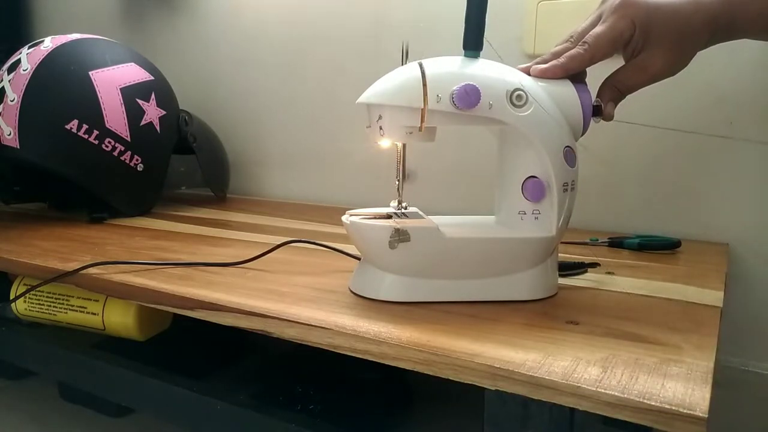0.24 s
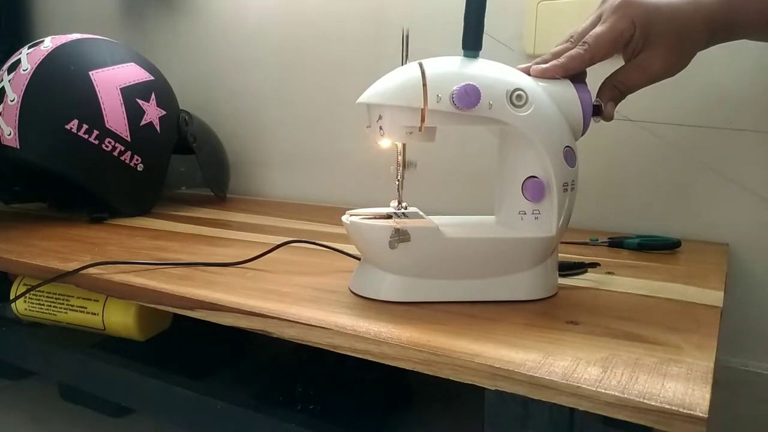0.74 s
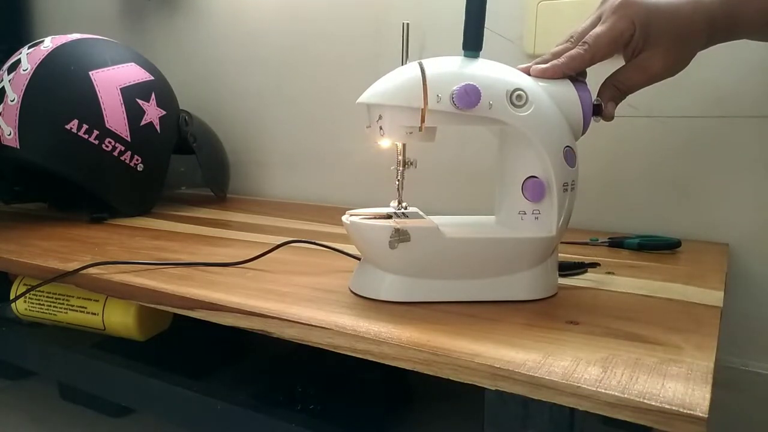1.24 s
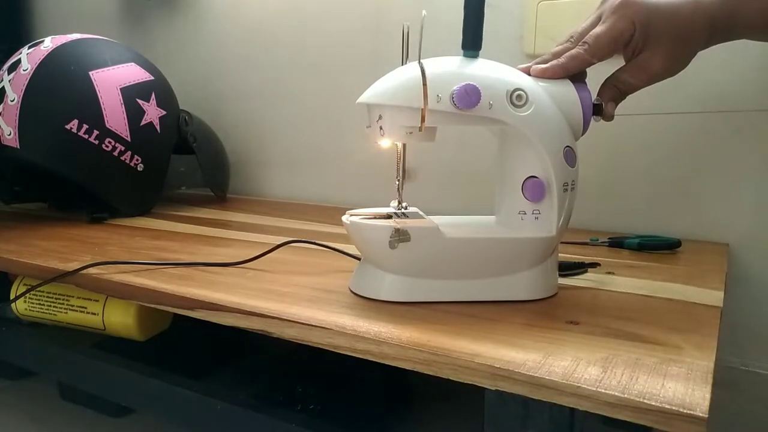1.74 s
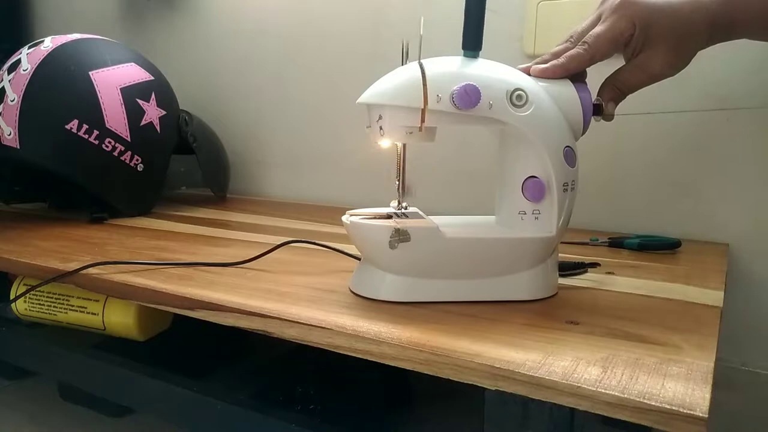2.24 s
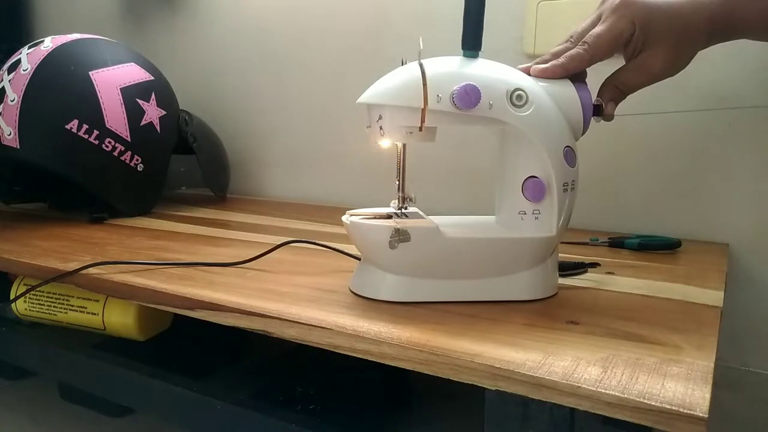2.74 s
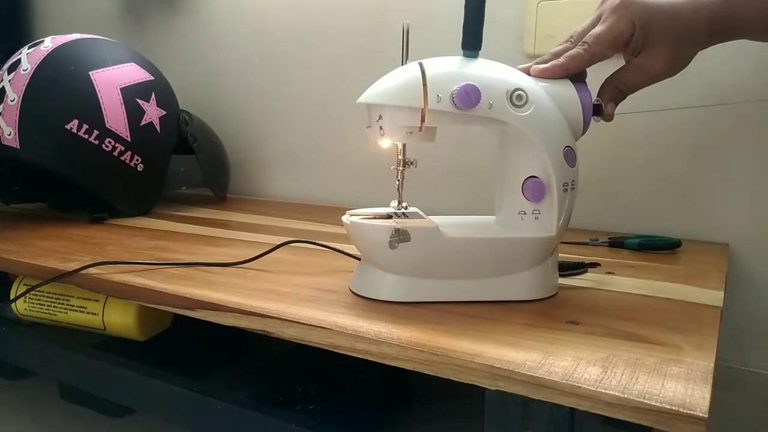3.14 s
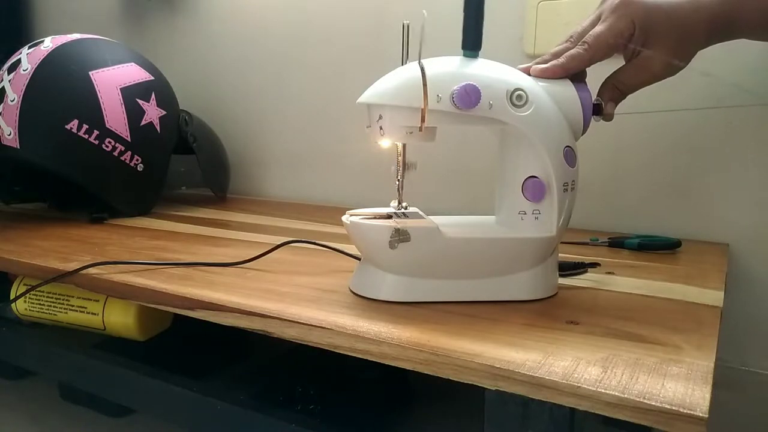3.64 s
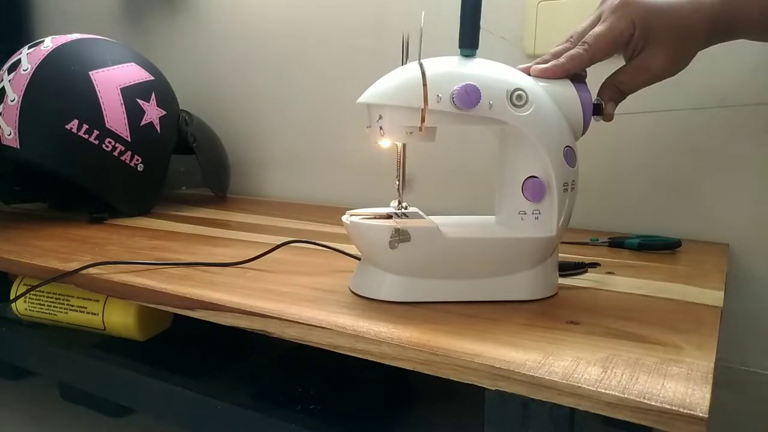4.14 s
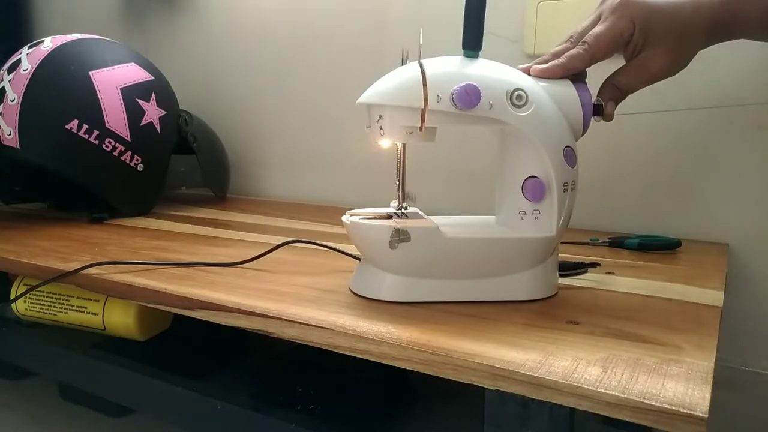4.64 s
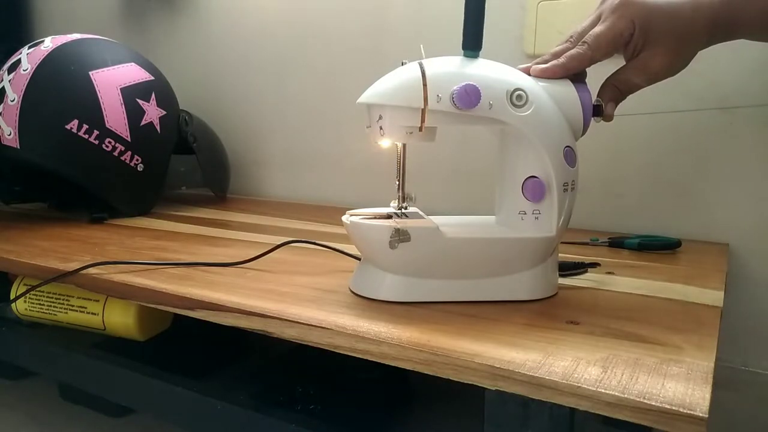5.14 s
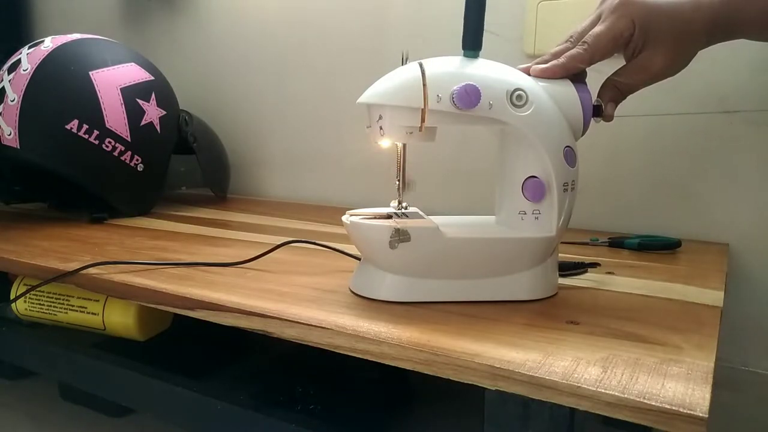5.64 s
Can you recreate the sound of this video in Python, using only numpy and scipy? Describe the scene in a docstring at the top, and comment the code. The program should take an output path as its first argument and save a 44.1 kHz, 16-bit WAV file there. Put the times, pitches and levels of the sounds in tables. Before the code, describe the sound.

A small electric sewing machine is already running at 0 s and continues without a break to the end, near 5.9 s. Its little motor gives a buzzy hum near 700 Hz under a piercing gear whine around 2.1 kHz, with a higher overtone near 4.2 kHz that gradually softens. The whine throbs and bends about thirty times a second, with a rough edge. Dense dry rattling and tiny ticks fill the plastic case. About six times a second the needle bar knocks and clacks, slightly uneven in strength, briefly pulling the motor pitch down. Brushes add a fine high hiss. A loose panel's buzz emerges after 2 s, is strongest around 3.6 s, then eases. Speed stays nearly constant, rising slightly in the last second. Faint deep table rumble and drone waver underneath. Close stereo microphone, small room, short reflections.

```python
"""A small plastic sewing machine runs steadily on a wooden table in a small room, heard close by in stereo.
Its three-pole motor hums, as sines locked to the shaft; the pinion whines against an eccentric wheel.
Dry gears rattle, tick and rub: random tiny impacts shaped by the resonances of the plastic case.
About six times a second the needle stroke knocks the case and drags the motor down for a moment.
Brushes hiss, a loose panel buzzes, and the table gives a low rumble and drone of filtered noise."""
import sys
import numpy as np
from scipy import signal
from scipy.fft import rfft, irfft
from scipy.io import wavfile

SR = 44100
rng = np.random.default_rng(int(sys.argv[2]) if len(sys.argv) > 2 else 0)


def wrap_up_sound(samples):
    """Save the sound to the file named by the first command line argument, as 16-bit audio."""
    columns = np.atleast_2d(samples).T
    # keep every value between -1 and 1, then stretch to whole-number steps
    tamed = np.clip(columns, -1, 1)
    steps = np.round(tamed * 32767).astype(np.int16)
    wavfile.write(sys.argv[1], SR, steps)


N = 260190
TIME = np.arange(N) / SR
TEETH, WHEEL_TEETH = 9, 68  # pinion, wheel

# nominal motor shaft speed: (time [s], speed [Hz])
SHAFT_SPEED = [(0, 229.85), (1, 230.99), (2, 231.05), (3, 232.06), (4, 231.18), (5, 231.12), (5.9, 236.44)]


def undb(db):
    """Decibels to gain."""
    return 10 ** (np.asarray(db) / 20)


def level(x, db):
    """Scale to an rms level."""
    return x * undb(db) / np.sqrt(np.mean(x ** 2))


def curve(rows):
    """Join (time [s], value) rows by straight lines."""
    return np.interp(TIME, *np.transpose(rows))


def cycle(wheel, place):
    """A cosine that peaks at one place of the wheel's turn."""
    return np.cos(2 * np.pi * (wheel - place))


def walk(rate_hz, step=16):
    """Smooth chance with a spread of 1, changing about rate_hz times a second."""
    coarse = TIME[::step]
    bins_hz = np.fft.rfftfreq(len(coarse), step / SR)
    lowpass = 1 / (1 + (2 * bins_hz / rate_hz) ** 4)
    slow = irfft(rfft(rng.standard_normal(len(coarse))) * lowpass, len(coarse))
    return np.interp(TIME, coarse, level(slow, 0))


def colour(x, points):
    """Filter by a (frequency [Hz], gain [dB]) spectrum."""
    hz, db = np.transpose(points)
    bins_hz = np.maximum(np.fft.rfftfreq(N, 1 / SR), 1)
    gain = undb(np.interp(np.log(bins_hz), np.log(hz), db))
    return irfft(rfft(x) * gain, N)


def resonate(x, hz, width_hz):
    """Pass a signal through one resonance, with gain 1 at its centre."""
    bins_hz = np.fft.rfftfreq(N, 1 / SR)
    return irfft(rfft(x) / (1 + 2j * (bins_hz - hz) / width_hz), N)


def mode(hz, t60_s):
    """The decaying ring of one resonance."""
    t = TIME[:SR // 2]
    return np.sin(2 * np.pi * hz * t) * np.exp(-np.log(1000) * t / t60_s)


def ring(x, response):
    """Pass a signal through an impulse response."""
    return signal.fftconvolve(x, response)[:N]


def room(x, wet_db, t60_s):
    """Direct sound plus a decaying noise tail of reflections, different at the two ports."""
    t = TIME[:SR // 2]
    tails = rng.standard_normal((2, len(t))) * undb(-60 * t / t60_s)
    tails *= t > .002  # gap before the first reflection
    tails /= np.sqrt(np.sum(tails ** 2, axis=1, keepdims=True))
    wet = signal.fftconvolve(np.atleast_2d(x), tails, axes=1)[:, :N]
    return (x + undb(wet_db) * wet) / np.sqrt(1 + undb(2 * wet_db))


def spread(noises, side_db):
    """A shared and an opposed noise make a partly alike left and right."""
    shared, opposed = noises
    return shared + undb(side_db) * opposed * np.array([[1], [-1]])


def grit(density=.6):
    """Two unrelated streams of dense tiny impacts."""
    return rng.standard_normal((2, N)) * (rng.random((2, N)) < density)


def clatter(force, spectrum):
    """Grit, driven by a force, sounds through the case with short reflections."""
    shared, opposed = colour(grit() * force, spectrum)
    # the table carries the lows to both ports alike; the treble arrives from all sides
    opposed = colour(opposed, [(150, -10.5), (700, -7.0), (1300, 0.0), (2500, -0.5)])
    return room(spread([shared, opposed], side_db=0), wet_db=-13, t60_s=.15)


def blows(strokes, delay_s, contrast=0.26):
    """One impulse per stroke, delay_s after it; contrast is how closely its size follows the force."""
    stroke_s, force_db = strokes
    out = np.zeros(N)
    at = np.clip(((stroke_s + delay_s) * SR).astype(int), 0, N - 1)
    out[at] = undb(contrast * force_db)
    return out


def swell(impulses, rise_s):
    """Each impulse becomes a bump that peaks after rise_s and dies away."""
    u = TIME[:SR // 2] / rise_s
    return ring(impulses, u * np.exp(1 - u))


def needle(stroke_turns=36.95, first_stroke_turns=5.83, scatter_db=0.45, play_s=.001):
    """The needle is geared to the shaft; linkage play scatters time and force of its clacks and thumps."""
    # strokes harder or softer than the rest, before each sound's contrast:
    # (time [s], clack force change [dB], thump force change [dB])
    uneven_strokes = [(.03, 2.5, -0.5), (.19, 3.5, 3.5), (.51, 1.5, -0.5), (1.31, 0.5, -6),
                      (1.63, 2.5, 3.5), (1.79, 0.5, 4), (2.27, 3.5, 4.5), (2.43, 2, 3.5), (2.59, -0.5, 0.5),
                      (2.75, 2.5, 3), (2.9, 5, 1), (3.06, 6, 3), (3.38, 2.5, -1), (3.86, 0, 1),
                      (4.18, 3, 0), (4.5, 5, 3.5), (4.66, 4, 0), (4.82, 0, -10), (4.98, 2.5, -4),
                      (5.14, 5, 3.5), (5.77, 2.5, 2)]
    turns = np.cumsum(curve(SHAFT_SPEED)) / SR
    stroke_s = np.interp(np.arange(first_stroke_turns, turns[-1], stroke_turns), turns, TIME)
    chance = rng.standard_normal((len(stroke_s), 3))
    stroke_s = stroke_s + play_s * chance[:, 0]
    forces_db = scatter_db * chance[:, 1:]
    for time_s, clack_db, thump_db in uneven_strokes:
        forces_db[np.argmin(np.abs(stroke_s - time_s))] += clack_db, thump_db
    return [(stroke_s, force_db - force_db.mean()) for force_db in forces_db.T]


def drag(strokes, upstroke=0.41):
    """Load on the motor: a sharp tug as the needle goes down, a lighter one as it is lifted."""
    down = swell(blows(strokes, -0.013, contrast=0.25), rise_s=.01)
    up = swell(blows(strokes, 0.036, contrast=0.047), rise_s=0.013)
    return down + upstroke * up


def shaft(load, sag=0.024, wander=0.001944):
    """Turns made by the motor, which slows under each stroke."""
    relative_speed = 1 - sag * (load - load.mean()) + wander * walk(23.4)
    return np.cumsum(curve(SHAFT_SPEED) * relative_speed) / SR


def hum(turns, wheel, load, sway_turns=0.025, flutter_db=2.0, duck_db=3):
    """Armature tones; the eccentric wheel sways their pitch and level."""
    # (multiple of shaft speed, level before effort [dB], wheel swell [+-dB], place of swell [turns])
    partials = [(1, -41.5, 0, 0), (3, -24.8, 2.2, -.05), (5, -36.5, 5, .54), (6, -43.5, 1.5, 0)]
    angle = 2 * np.pi * (turns + sway_turns * cycle(wheel, 0.13))
    tones = 0
    for k, db, swell_db, place in partials:
        drive_db = swell_db * cycle(wheel, place) - duck_db * load + flutter_db * walk(94)
        tones = tones + level(np.sin(round(k) * angle) * undb(drive_db), db)
    return room(tones, wet_db=-15, t60_s=0.12)


def walls(ports):
    """Each wall resonance lifts or swallows the whine as its pitch slides past, differently per port."""
    # (frequency [Hz], width [Hz], left gain at centre [dB], right gain at centre [dB])
    wall_modes = [(2041, 30, 3, -6), (2082, 6, -10, -8), (2095, 26, 3.5, 6), (4020, 80, -1, 3),
                  (4105, 70, -1, -5), (4175, 70, 2, 0)]
    for hz, width_hz, left_db, right_db in wall_modes:
        change = undb([[left_db], [right_db]]) - 1
        ports = ports + change * resonate(ports, hz, width_hz)
    return ports


def whine(turns, wheel, load, rough_db=1.5, shaft_db=0.5, uneven_db=1.3, load_db=2.2,
          slack_turns=.0024, swing_turns=.016, bite_db=6, bite_loss_db_per_s=1.08):
    """Teeth mesh tighter once per wheel turn and under load: the whine throbs, bends and is rough."""
    # (multiple of tooth rate, level before bite and effort [dB], wheel swell [+-dB],
    #  place of swell [turns], lean [turns]: + rises slowly and drops fast)
    partials = [(1, -22.3, 7.5, .11, -.04), (2, -28.1, 8.5, .13, .11), (3, -44.5, 4, .13, 0)]
    mesh = turns + swing_turns * cycle(wheel, .07)
    shaft_drive_db = shaft_db * cycle(turns - wheel, 0)
    # each port hears another wall of the case, with its own slack and phase
    slack = slack_turns * np.array([walk(170), walk(200)])
    angles = 2 * np.pi * TEETH * (mesh + slack) + np.array([[0], [np.pi / 4]])
    # tooth contact softens as it runs, which dulls the whine
    bite_per_partial_db = bite_db - bite_loss_db_per_s * TIME
    out = 0
    for k, db, swell_db, place, lean in partials:
        grip = cycle(wheel - lean * cycle(wheel, place), place)
        contact_db = rough_db * walk(270) + load_db * load + uneven_db * walk(34)
        drive_db = shaft_drive_db + swell_db * grip + contact_db / k ** 2
        tone = walls(np.sin(k * angles) * undb(drive_db))
        out = out + level(tone, db) * undb((k - 1.0) * bite_per_partial_db)
    return room(out, wet_db=-17, t60_s=.12)


def rattle(strokes, wheel, throb_db=0.5, knock=0.23, upstroke=0.16, lull=0.11, db=-18.5):
    """Gears and linkage clatter, harder at each reversal of the needle bar and less in between."""
    # plastic case, as the gears rattle it: (frequency [Hz], gain [dB])
    case_spectrum = [(60, -12), (140, -18), (230, 0.5), (345, -5), (440, -1), (600, -2.5), (670, -1.5),
                     (760, 2), (1000, -2.5), (1950, -1), (2400, -4.5), (2750, -2.5), (3300, -7.5),
                     (4400, -6.5), (6800, -32)]
    force = 1 + knock * swell(blows(strokes, -0.0087, contrast=0.83), rise_s=0.0042)
    force += upstroke * swell(blows(strokes, 0.053), rise_s=0.014)
    force -= lull * swell(blows(strokes, 0.024), rise_s=0.026)
    return level(clatter(force * undb(throb_db * cycle(wheel, 0.53)), case_spectrum), db)


def ticks(wheel, per_s=80, scatter_db=4.0, throb=.45, db=-23.0):
    """Loose teeth tap the case unevenly, most often at one place of the wheel; each tap rings briefly."""
    # small parts of the case: (frequency [Hz], t60 [s], relative level [dB])
    part_modes = [(642.5, 0.2, -4), (748, 0.044, 0.5), (782, 0.067, -2.5), (877, 0.041, 0.5),
                  (981, .05, -5.5), (1397, 0.044, -0.5), (1753, 0.044, 0), (1822, 0.063, -4.5),
                  (2210, 0.016, 2), (2780, 0.0092, -2), (3350, 0.0061, -2.5), (4420, 0.054, -17),
                  (6030, 0.053, -14), (6360, 0.033, -16)]
    odds = per_s / SR * (1 + throb * cycle(wheel, .51))  # per sample and part
    out = 0
    for hz, t60_s, mode_db in part_modes:
        size_db = scatter_db * np.clip(rng.standard_normal(N), -2, 2)
        taps = (rng.random(N) < odds) * rng.choice([-1, 1], N) * undb(size_db)
        out = out + level(ring(taps, mode(hz, t60_s)), mode_db)
    return level(room(out, wet_db=-2.5, t60_s=0.05), db)


def knocks(strokes, rebound=0.35, scatter=0.13, chatter=0.0075, db=-27):
    """The needle bar strikes and rebounds, ringing case and table; loose parts keep them ringing."""
    # case and table top: (frequency [Hz], t60 [s], gain [dB], share of the blow reaching the mode)
    stroke_modes = [(172, .24, -1.5, 0.83), (203, 0.27, -6, 1.2), (235, 0.1, -2.5, 0.86),
                    (297.5, 0.21, -2.5, 0.5), (365.5, 0.14, -3.5, 0.5), (441, 0.11, -5.5, 0.59),
                    (506.3, 0.28, 0, 0.63), (547.5, 0.28, -6, 0.59), (829, 0.038, 7.5, 1.4)]
    hits = blows(strokes, 0, contrast=0.61) + rebound * blows(strokes, 0.029, contrast=0.28)
    jiggle = chatter * rng.standard_normal(N)
    onset = 1 - np.exp(-TIME[:SR // 2] / 0.0037)
    out = 0
    for hz, t60_s, mode_db, share in stroke_modes:
        blow = share * hits * (1 + scatter * rng.standard_normal(N))
        out = out + undb(mode_db) * ring(blow + jiggle, mode(hz, t60_s) * onset)
    return level(room(out, wet_db=-10.0, t60_s=0.37), db)


def clacks(strokes, rebound=0.26, db=-31):
    """The linkage snaps across its play at each stroke and bounces once."""
    # dry clack as the needle bar reverses: (frequency [Hz], gain [dB])
    clack_spectrum = [(250, -13), (750, 1.5), (1300, 6.5), (2000, 2.5), (3300, -1), (4500, -7), (6500, -14),
                      (9000, -11), (15000, -31)]
    snap = swell(blows(strokes, -0.0023, contrast=0.85), rise_s=0.003)
    bounce = swell(blows(strokes, 0.0079, contrast=0.74), rise_s=0.0014)
    return level(clatter(snap + rebound * bounce, clack_spectrum), db)


def brushes(strokes, knock=0.46, flicker_db=1.54, db=-30):
    """The brushes hiss on the commutator, shaken by each stroke."""
    # (frequency [Hz], gain [dB])
    hiss_spectrum = [(2500, -44), (4500, -8), (5500, -1.5), (6400, -1), (6850, -16), (7600, -4.5),
                     (8300, 0), (9800, -8.5), (11500, -17), (13500, -23), (15200, -9)]
    force = 1 + knock * swell(blows(strokes, -0.0048, contrast=1.0), rise_s=0.0023)
    return level(clatter(force * undb(flicker_db * walk(54)), hiss_spectrum), db)


def chafe(wheel, throb_db=8, place=0.58, hz=1153, width_hz=96, db=-33):
    """The high side of the wheel rubs once per turn, a short rough rasp in one resonance of the case."""
    rub = grit() * undb(throb_db * cycle(wheel, place))
    rasp = resonate(resonate(rub, hz, width_hz), hz, width_hz)
    return level(spread(rasp, side_db=-19), db)


def buzz(wheel, throb_db=8.0, place=0.3):
    """A loose panel chatters in its own resonances, once per wheel turn."""
    # grows as the machine gets going, then eases: (time [s], level before effort [dB])
    buzz_level = [(1.5, -45), (2.3, -33), (3.6, -28), (5, -34)]
    # (frequency [Hz], width [Hz], gain [dB])
    panel_modes = [(1395, 33, 2), (1500, 37, 5.5), (1730, 61, -9)]
    taps = grit() * undb(throb_db * cycle(wheel, place))
    chatter = sum(undb(db) * resonate(taps, hz, width_hz) for hz, width_hz, db in panel_modes)
    return level(spread(chatter, side_db=-13), 0) * undb(curve(buzz_level))


def table(rumble_db=-1, drone_db=-2, waver_db=2.5):
    """The shaking table gives a deep rumble and a drone, both wavering noise."""
    # low rumble of table and room: (frequency [Hz], gain [dB])
    rumble_spectrum = [(22, -19), (32, 3.5), (46, -1.5), (65, -5.5), (140, -6.5), (300, -21), (600, -33),
                       (2000, -70)]
    # its course, before trim and waver: (time [s], gain [dB])
    rumble_gain = [(0, -31), (.35, -33), (1.1, -43), (1.65, -35), (2.0, -30.5), (3.0, -38), (3.65, -33),
                   (4.72, -52), (5.3, -33), (5.9, -37)]
    # drone of the table top: (frequency [Hz], gain [dB])
    drone_spectrum = [(50, -20), (74, -5), (88, 3.5), (115, -4), (150, -18), (600, -68)]
    # its course, before trim and waver: (time [s], gain [dB])
    drone_gain = [(0, -37), (.6, -44), (3.1, -47), (3.7, -33), (5.9, -42)]
    layers = [(rumble_spectrum, rumble_gain, rumble_db), (drone_spectrum, drone_gain, drone_db)]
    out = 0
    for spectrum, gain, trim_db in layers:
        shake = colour(spread(rng.standard_normal((2, N)), side_db=-11), spectrum)
        out = out + level(shake, trim_db) * undb(curve(gain) + waver_db * walk(2.8))
    return out


def scene():
    """One shaft drives every part of the machine; the table sounds beneath."""
    # effort of the drive: (time [s], gain [dB])
    effort = [(0, -1), (.8, 0.33), (2.4, 1.03), (5.3, 0.76), (5.9, 1.7)]
    strokes, thumps = needle()
    load = drag(strokes)
    turns = shaft(load)
    wheel = turns * TEETH / WHEEL_TEETH + .27  # wheel turns
    machine = hum(turns, wheel, load) + whine(turns, wheel, load)
    machine = machine + rattle(strokes, wheel) + ticks(wheel)
    machine = machine + knocks(thumps) + clacks(strokes)
    machine = machine + brushes(strokes) + chafe(wheel) + buzz(wheel)
    return machine * undb(curve(effort)) + table()


def record(dry, ceiling=.95, top_hz=15550):
    """The right port is shaded; the highest peaks are rounded and the top is cut off."""
    # right port, facing away from the machine: (frequency [Hz], gain relative to the left [dB])
    right_port = [(200, 0.5), (550, -2), (740, -4), (930, 2.5), (1350, -1), (2000, -1), (2600, -1),
                  (3700, 2.5), (4200, -0.5), (7000, 2), (8500, -6), (9700, -18.5), (12800, -3.5),
                  (15200, -26)]
    ports = np.array([dry[0], colour(dry[1], right_port)])
    ports = ports / (1 + (ports / ceiling) ** 8) ** (1 / 8)
    lowpass = signal.ellip(10, .2, 80, top_hz, fs=SR, output="sos")
    return signal.sosfilt(lowpass, ports)


dry = scene()
out = record(dry)
wrap_up_sound(out)
```